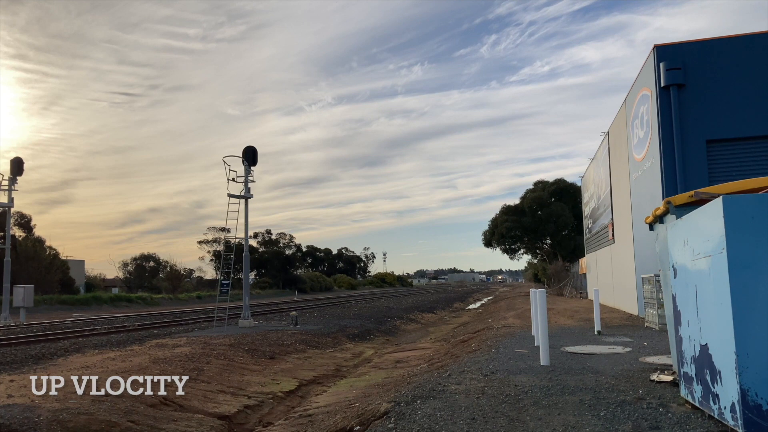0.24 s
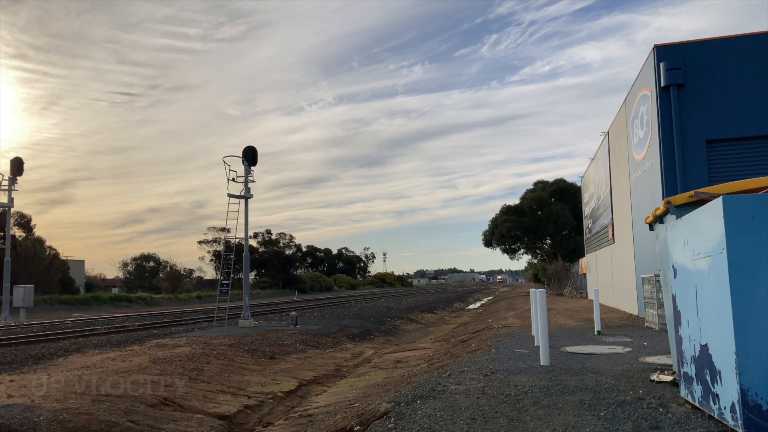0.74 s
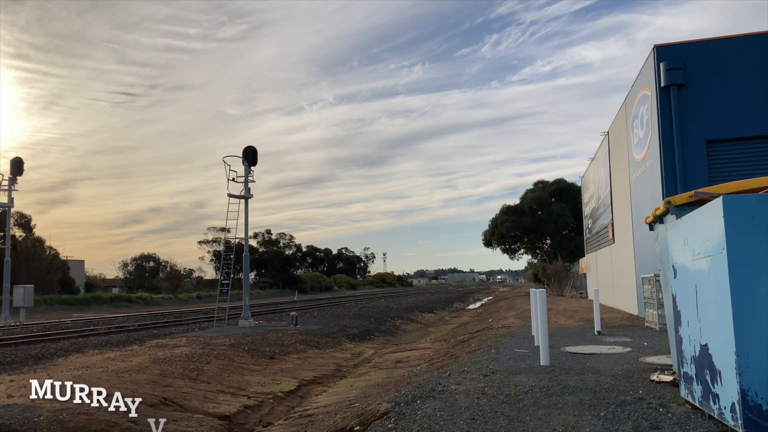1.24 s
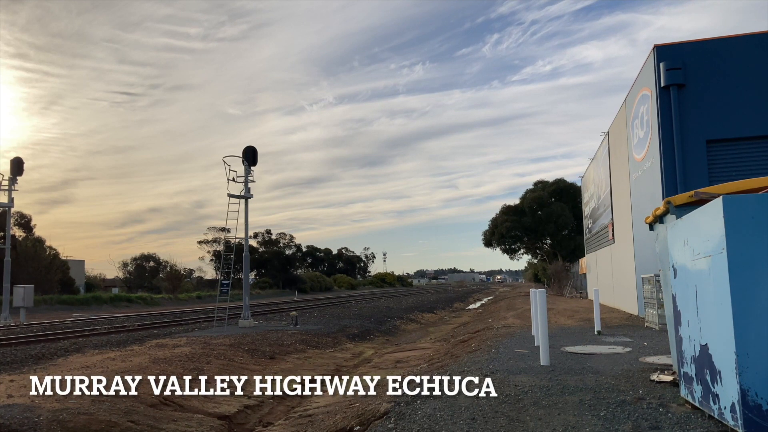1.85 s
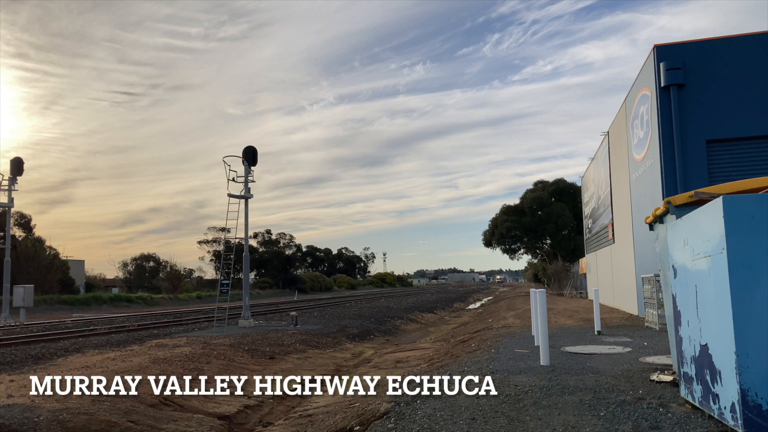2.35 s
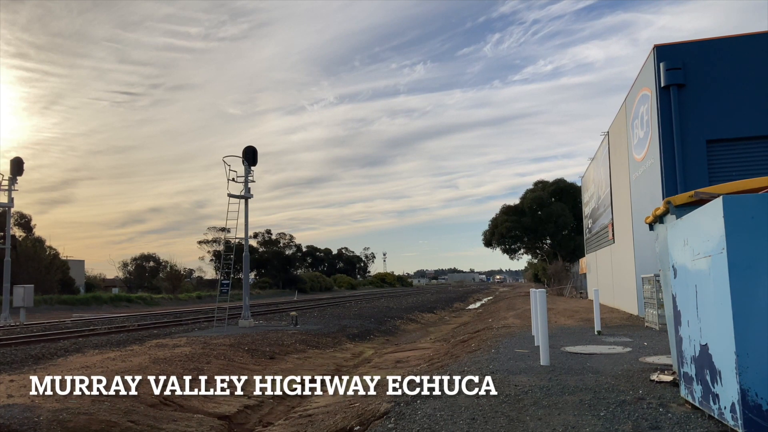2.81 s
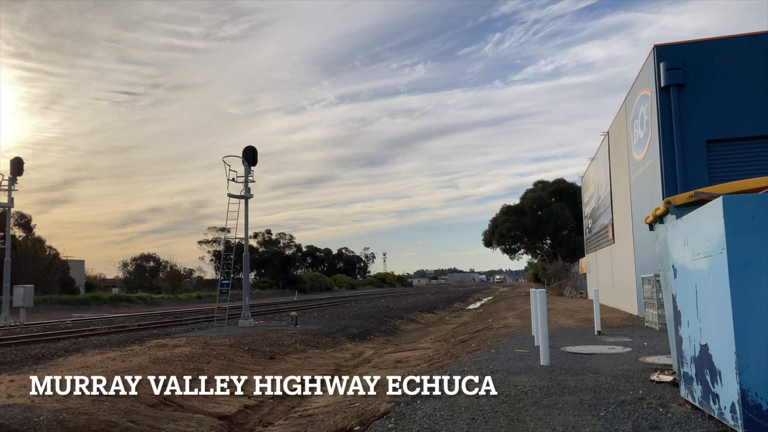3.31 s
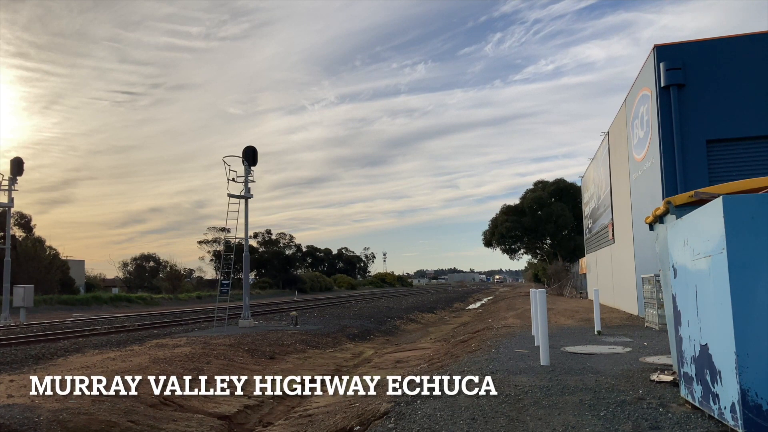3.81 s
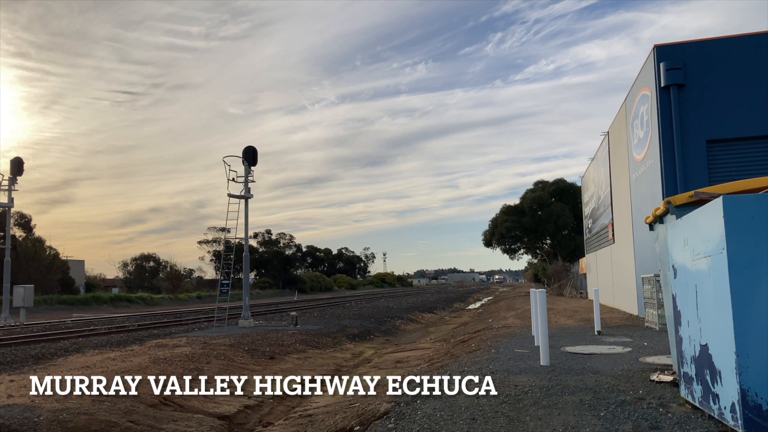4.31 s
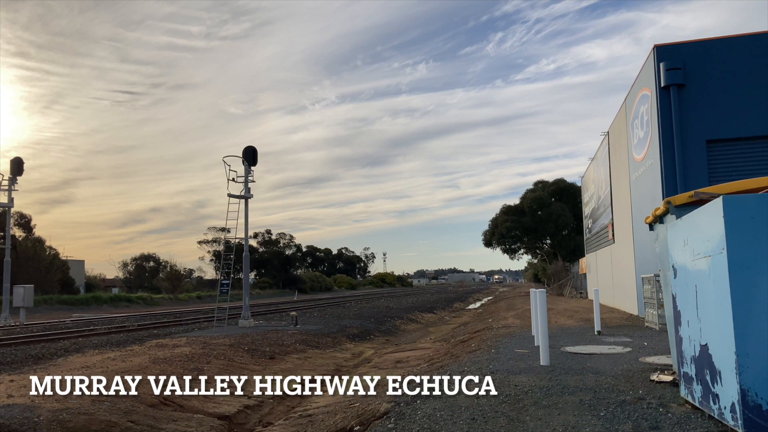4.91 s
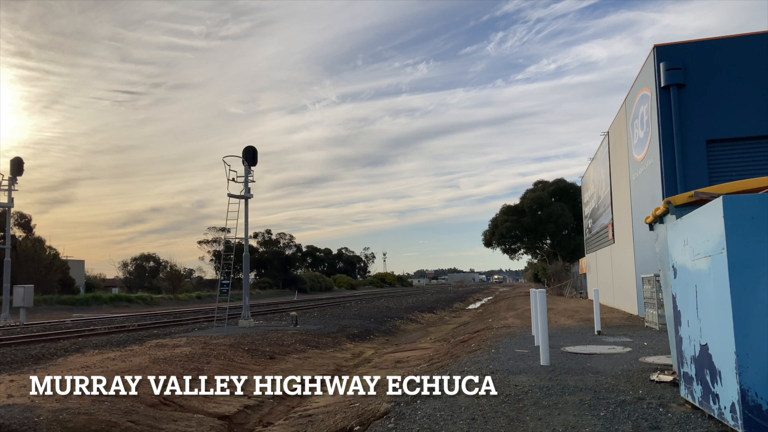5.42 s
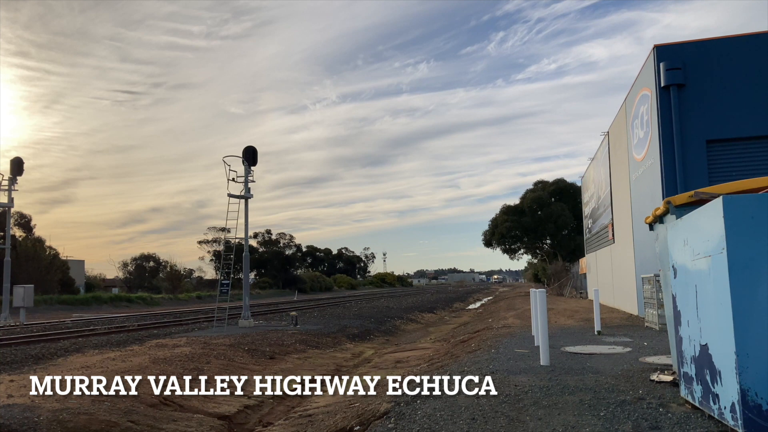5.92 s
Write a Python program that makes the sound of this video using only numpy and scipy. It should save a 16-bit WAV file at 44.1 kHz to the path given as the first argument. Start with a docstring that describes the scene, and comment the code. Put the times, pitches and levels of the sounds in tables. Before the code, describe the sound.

Roadside outdoors: rattling truck and trailer clank past, engine climbing and dropping in pitch, very high brake squeal, then duller low traffic rumble.

```python
"""First comes the rumble and tyre roar of a heavy vehicle close by, its left side leading, its load jingling.
Bumps thud, clang and clatter in its metal; grit snaps. It draws level, then drops away to a duller wash.
An engine climbs in pitch and drops back as the gear changes, its harmonics shaped by an exhaust pipe.
A thin, very high squeal, like dragging brakes, comes in several bites and fades: friction-driven resonance.
Shaped noise makes the road, with distant traffic building under it and a shed wall echoing alongside."""
import sys
import numpy as np
from scipy import signal
from scipy.fft import rfft, irfft
from scipy.io import wavfile

SR = 44100
rng = np.random.default_rng(int(sys.argv[2]) if len(sys.argv) > 2 else 0)


def file_out(sig):
    """Save sig as 16-bit WAV at sys.argv[1]."""
    # one column per channel
    cols = np.atleast_2d(sig).T
    # limit, then scale
    lim = np.clip(cols, -1, 1)
    pcm = np.round(lim * 32767).astype(np.int16)
    wavfile.write(sys.argv[1], SR, pcm)


N = 271215
T = np.arange(N) / SR
HZ = np.maximum(np.arange(N // 2 + 1) * SR / N, 1)   # frequency bins, kept above zero for the logarithms

# Splits between the five road bands: rumble, boom, tyre roar, whirr, hiss [f/Hz]
BAND_EDGES_HZ = [110, 300, 1400, 3200]
# Colour of the close vehicle, the wash it leaves behind and the distant stream
# [f/Hz, relative level/dB per Hz]
NEAR_SPECTRUM = [(24, -32), (38, -10.5), (68, -6), (110, -9.5), (215, -6.5), (490, -17.5), (950, -16),
                 (1550, -29), (2400, -22), (3200, -25), (4000, -28), (4600, -28.5), (5900, -38),
                 (7700, -35.5), (9200, -65), (11200, -38.5), (12400, -79)]
LEAVING_SPECTRUM = [(24, -22), (40, -7), (68, -4), (130, -9), (215, -12), (330, -20.5), (600, -23.5),
                    (830, -20.5), (2000, -33.5), (2700, -27.5), (3400, -48.5), (4900, -51.5), (5800, -54.5),
                    (7700, -53.5)]
FAR_SPECTRUM = [(24, -15), (40, -7.5), (85, -1.5), (150, -3), (240, -8), (310, -20.5), (500, -26),
                (830, -30.5), (1250, -37.5), (1600, -29), (2300, -31), (3400, -45.5), (4800, -44),
                (5900, -59), (7700, -61), (9200, -77), (11000, -58.5)]
# How near and far sound reaches the two microphones
# [f/Hz, likeness/0-1, left lead/rad, left minus right/dB]
NEAR_ARRIVAL = [(60, 0.98, 0.0, -1.8), (200, 0.92, 0.6, -2.9), (340, 0.82, 1.1, -3.0),
                (500, 0.86, 2.0, -1.0), (800, 0.88, 2.3, 1.9), (1300, 0.75, 2.5, 0.1),
                (2000, 0.46, 3.7, -2.0), (3000, 0.38, 5.7, -2.5), (4200, 0.41, 8.0, -3.7),
                (6000, 0.36, 9.9, -4.9), (8000, 0.45, 10.4, -1.5)]
FAR_ARRIVAL = [(60, 0.93, -0.0, -0.9), (200, 0.81, 0.2, -1.5), (340, 0.43, 0.8, -0.2), (500, 0.7, 2.3, 2.0),
               (800, 0.82, 2.6, 2.0), (1300, 0.81, 3.4, -0.9), (2000, 0.71, 5.5, -0.4),
               (3000, 0.55, 8.1, -0.4), (4200, 0.29, 11.6, 0.1), (6000, 0.31, 15.7, -1.1),
               (8000, 0.43, 17.2, -0.4)]
# Close vehicle as it draws level, one entry per road band [level/dB]
NEAR_DB = [-35.5, -37, -41, -56.5, -55]
# Its growth before that, brightening as it comes, one entry per road band [growth/dB per s]
APPROACH_DB_PER_S = [-0.7, -0.1, 0, 3, 6]
PASS_S, DROP_DB_PER_S = 1.776, 49   # once level, its direct sound drops quickly
# Duller wash that lingers once it has passed, one entry per road band [level/dB]
LEAVING_DB = [-40, -41, -47.5, -67.5, -67]
LEAVING_RISE_S, LEAVING_END_S, LEAVING_DB_PER_S = 0.24, 3.59, 11.5
# Distant stream at the moment of the pass, one entry per road band [level/dB]
FAR_DB = [-44, -42.5, -51, -56.5, -72.5]
FAR_DB_PER_S = 0.5159   # slow build
# Tyre noise swelling as wheels roll by
# [t/s, width/s, boom peak level/dB, roar peak level/dB, whirr peak level/dB, hiss peak level/dB]
WHEELS = [(0.02, 0.94, -43, -49, -76, -66.5), (1.17, 0.037, -34.5, -58, -71, -66),
          (1.29, 0.04, -35, -61, -57, -54.5), (1.42, 0.05, -39, -54, -61, -60),
          (1.56, 0.079, -60, -44, -55, -57), (1.82, 0.09, -39, -43.5, -54.5, -57),
          (2.07, 0.11, -37.5, -45.5, -70, -64.5), (2.35, 0.079, -41, -47, -75, -64.5),
          (4.85, 0.16, -44, -59.5, -69.5, -81), (6.04, 0.059, -56, -49, -75, -78)]
# Tyre whirr of an earlier car [f/Hz, relative level/dB per Hz]
EARLIER_CAR = [(1150, -17.5), (1450, 6), (1900, -3.5), (2500, -9), (3200, -23)]
EARLIER_CAR_DB, EARLIER_CAR_DB_PER_S = -51, 13   # level at the start, then its fade

# Resonances of the engine's exhaust pipe [f/Hz, gain/dB]
EXHAUST = [(62, 2.5), (69, 1.5), (73, 1), (76, 2), (78, 4.5), (80, -3.5), (83, -7), (125, 0), (138, 0.5),
           (146, -2.5), (156, 1), (160, -1.5), (165, 5), (200, -18.5), (232, -16), (240, -15.5), (248, -5),
           (285, -26), (318, -18), (335, -25.5), (700, -29)]
# Engine pulling through its gears; level is at CRUISE_HZ, ahead of the pipe
# [start t/s, end t/s, first firing f/Hz, last firing f/Hz, level/dB, overtone gain/dB]
PULLS = [(-.1, 0.565, 75, 83.76, -45, 2), (0.665, 1.22, 65.63, 71.2, -32.5, -8.5),
         (2.501, 3.204, 63.5, 66.78, -44.5, 2.5), (3.379, 5.66, 65.9, 83.61, -39.5, 0.5),
         (5.721, 6.2, 74, 75, -57, 2.5)]
PULL_BEND = .85   # below 1: the revs climb more slowly towards the end
THROTTLE_RISE_S, THROTTLE_OFF_DB_PER_S = 0.107, 38
SAG_HZ, SAG_S = 10, 0.04475   # the revs drop when the throttle closes
CRUISE_HZ, LOAD_DB_PER_HZ = 75, 0.16   # reference firing rate; louder at higher revs

# Grit snapping under tyres [t/s, level/dB, f/Hz]
GRIT = [(0.1246, -47, 7600), (0.2161, -37, 4600), (0.3305, -38, 6700), (0.3315, -39, 2600),
        (0.3535, -47, 6000), (0.459, -41, 5400), (0.667, -43, 7200), (1.03, -35, 3400), (1.203, -42, 4300),
        (1.682, -35, 2200)]
# Colour shared by the grit cracks [f/Hz, relative level/dB per Hz]
GRIT_SPECTRUM = [(1800, 10), (3000, 1), (5000, 0), (7800, 3), (9200, -18), (11000, 5.5), (14000, -35)]
GRIT_T60_S, GRIT_RISE_S = .008, .0002
GRIT_WIDTH_HZ, GRIT_RESONANCE_DB = 880, 11   # each stone's own resonance, added to the plain crack

# Load and trailer knocking; the thud is further weighted by the body's modes, t60 is of clang and clatter
# [t/s, thud level/dB, thud f/Hz, clang level/dB, clatter level/dB, t60/s]
KNOCKS = [(0.218, -27, 260, -45, -45, 0.048), (0.658, -24.5, 420, -40, -48, 0.11),
          (0.6704, -24.5, 220, -48, -69, 0.093), (.674, -35, 600, -50, -62, .06),
          (0.692, -26.5, 210, -56, -46.5, 0.082), (0.877, -30, 220, -41, -75, .15),
          (0.942, -31, 373, -50, -68, .1), (1.03, -31, 600, -30.5, -39, 0.13),
          (1.05, -40, 600.5, -42, -51, 0.22), (1.067, -44, 300, -43, -51, 0.23),
          (1.203, -40, 200, -46, -47.5, 0.36), (1.225, -42, 250, -53, -54, 0.13),
          (1.682, -37, 620, -38, -35, 0.13), (1.703, -43, 300, -36, -51.5, 0.58),
          (1.79, -33, 330, -51, -52, .2), (1.827, -41, 400, -51, -47, 0.099),
          (1.88, -38, 350, -47, -54, .12)]
# Steel body of the trailer; the load halves these decay times [f/Hz, level/dB, unloaded t60/s]
TRAILER_MODES = [(203, -2, 0.23), (222, 2, 0.36), (307, -2.5, 0.37), (389, 8.5, 0.14), (560, 3, 0.19),
                 (640, 0, 0.14)]
THUD_RISE_S, THUD_SPREAD_OCTAVES = 0.0021, 0.43   # brief build-up; reach around each bump's pitch
# Colour of the clanging and clattering steel [f/Hz, relative level/dB per Hz]
CLATTER_SPECTRUM = [(400, 0), (600, 12.5), (800, 5.5), (1300, 7), (2400, 9), (4000, 6), (7500, -3.5),
                    (10000, -52)]
# Ringing of the steel fittings [f/Hz, width/Hz, level above the rest of the clatter/dB]
FITTINGS = [(814, 28, 10), (1244, 50, 11.5), (2244, 49, 10), (2770, 180, 7), (3200, 60, 7.5),
            (3740, 70, 11), (4140, 92, 12), (4560, 70, 8), (5320, 21, 8), (6640, 38, 11)]
CLANG_BELOW_HZ = 1224   # panels clang below this, small fittings clatter above
BLOW_RISE_S = .0003

# Low exhaust boom surging [t/s, peak level/dB, f/Hz]
SURGES = [(.4, -28.5, 80.9), (.78, -34.5, 60.4), (1.18, -32, 69.7), (1.33, -38, 62.4), (2.08, -31, 63.2),
          (2.58, -30, 63.9), (2.79, -33.5, 76), (3.08, -30, 70.9), (3.27, -38, 67.5), (3.48, -34, 64.4),
          (4.8, -34, 75.1), (5.68, -36, 95.6)]
SURGE_WIDTH_S, SURGE_BAND_HZ = 0.024, 9.9
# Loose metal parts clinking [t/s, peak level/dB, f/Hz, t60/s]
CLINKS = [(.532, -23, 860, 0.05), (0.535, -25, 1100, 0.04), (.563, -34, 4820, .04), (.567, -42, 5080, 0.1)]

# Pitch line of the brake squeal [t/s, f/Hz]
SQUEAL_PITCH = [(0.7, 15420), (1.0, 15370), (1.5, 15300), (2.0, 15170), (2.5, 15090), (3.2, 15075),
                (4.2, 15100), (6.15, 15150)]
# The brake biting and squealing [start t/s, end t/s, level/dB, fade afterwards/dB per s]
BITES = [(0.744, 1.188, -36.5, 4), (1.11, 2.1, -33, 9), (2.856, 3.223, -26.5, 26), (3.42, 3.57, -29, 112),
         (3.704, 4.13, -40.5, 14), (5.75, 6.15, -60, 14)]
BITE_RISE_S = 0.17
# Brief thin tones and narrow bands of noise, mostly high and faint
# [start t/s, end t/s, f/Hz, width/Hz, peak level/dB]
THIN_TONES = [(.95, 1.01, 3200, 90, -54), (.97, 1.1, 12830, 120, -61), (1.14, 1.24, 12850, 120, -61),
              (1.17, 1.34, 7680, 100, -61), (1.51, 1.6, 7660, 90, -60), (1.58, 1.87, 9800, 120, -64),
              (1.6, 1.67, 5410, 50, -58), (3.24, 3.64, 8650, 50, -69), (3.6, 4.3, 11600, 35, -64),
              (4.25, 4.75, 11570, 35, -73), (4.72, 4.78, 4900, 900, -69), (5.02, 5.07, 5150, 250, -68),
              (5.1, 5.42, 11050, 40, -66), (5.15, 5.182, 4800, 450, -63), (5.18, 5.47, 12900, 60, -72),
              (5.19, 5.31, 7400, 1000, -76), (5.3, 5.97, 11055, 36, -48.5), (5.82, 6.1, 12890, 35, -71)]

# Other engines in the stream [start t/s, end t/s, f/Hz, level/dB]
DRONES = [(1.097, 1.437, 127.4, -40), (1.75, 2.15, 156, -44.5), (2.26, 2.65, 84.9, -42.5),
          (3.3, 6.15, 122.1, -46.5), (4.55, 5.3, 100.1, -42)]
DRONE_RISE_S, DRONE_FADE_DB_PER_S = 0.1, 58.5
# Hollow drone of the tyres as they pass [f/Hz, relative level/dB per Hz]
TYRE_DRUM = [(230, -14), (320, 5), (400, 4), (520, -3), (650, -25)]
DRUM_S, DRUM_WIDTH_S, DRUM_DB = 1.847, 0.16, -39.5

CUTOFF_HZ = 15850


def from_db(db):
    """Decibels to gain."""
    return 10 ** (np.asarray(db) / 20)


def rms(x):
    """Root mean square."""
    return np.sqrt(np.mean(x ** 2) + 1e-20)


def in_time(rows):
    """Each column of a curve, at every sample."""
    s, *columns = np.transpose(rows)
    return [np.interp(T, s, c) for c in columns]


def in_frequency(rows):
    """Each column of a spectrum table, at every frequency bin, drawn on a log frequency axis."""
    hz, *columns = np.transpose(rows)
    return [np.interp(np.log(HZ), np.log(hz), c) for c in columns]


def colour(spectrum):
    """Gain per bin, falling away steeply beyond the table's ends."""
    ends = np.minimum(1, HZ / spectrum[0][0]) * np.minimum(1, spectrum[-1][0] / HZ)
    return from_db(in_frequency(spectrum)[0]) * ends ** 6


def drift(rate_hz):
    """Random wander of rms 1, smoothed above the given rate."""
    slow = irfft(rfft(rng.standard_normal(N)) / (1 + (HZ / rate_hz) ** 2), N)
    return slow / rms(slow)


def stereo_noise(gain, arrival):
    """Spectra of left and right noise from one direction; their sum has the given colour."""
    alike, lead, balance_db = in_frequency(arrival)
    alike = np.clip(alike, 0, .995)
    tilt = from_db(balance_db / 2)
    common, own = rfft(rng.standard_normal((2, N)))
    right = alike * np.exp(-1j * lead) * common + np.sqrt(1 - alike ** 2) * own
    summed = np.sqrt(tilt ** 2 + tilt ** -2 + 2 * alike * np.cos(lead))
    return np.array([common * tilt, right / tilt]) * gain / summed


def sound_of(spectra):
    """Stereo spectra to sound whose mid has rms 1."""
    x = irfft(spectra, N)
    return x / rms(x.mean(axis=0))


def from_near(x):
    """One sound as it reaches both microphones from the near vehicle: delayed and tilted by frequency."""
    _, lead, balance_db = in_frequency(NEAR_ARRIVAL)
    tilt = from_db(balance_db / 2)
    return irfft(rfft(x) * np.array([tilt, np.exp(-1j * lead) / tilt]), N)


def burst(start, t60, rise):
    """Envelope of a blow: a quick rise, then exponential decay."""
    age = np.maximum(T - start, 0)
    return (1 - np.exp(-age / rise)) * np.exp(-np.minimum(np.log(1000) * age / t60, 20))


def held(start, end, rise_s, fade_db_per_s):
    """Envelope that eases in, holds at 1 and fades after its end."""
    rise = np.sin(np.pi / 2 * np.clip((T - start) / rise_s, 0, 1)) ** 2
    return rise * from_db(-abs(fade_db_per_s) * np.maximum(T - end, 0))


def swelling(s, db, width_s):
    """Envelope of a smooth swell around one moment."""
    return from_db(db) * np.exp(-.5 * ((T - s) / width_s) ** 2)


def ring(clicks, hz, t60):
    """A two-pole resonator: a unit click sets a decaying sine of height 1 ringing."""
    r, w = from_db(-60 / (t60 * SR)), 2 * np.pi * hz / SR
    return signal.lfilter([0, np.sin(w)], [1, -2 * r * np.cos(w), r * r], clicks + 1e-18)


def near_gain(band):
    """The close vehicle in one band: it approaches, draws level and drops away."""
    before, after = np.maximum(PASS_S - T, 0), np.maximum(T - PASS_S, 0)
    return from_db(NEAR_DB[band] - APPROACH_DB_PER_S[band] * before - DROP_DB_PER_S * after)


def traffic(flutter_db=1.5, flutter_rate_hz=14):
    """Exhaust rumble and tyre noise, handed over from the passing vehicle to the distant stream."""
    near = stereo_noise(colour(NEAR_SPECTRUM), NEAR_ARRIVAL)
    leaving = stereo_noise(colour(LEAVING_SPECTRUM), FAR_ARRIVAL)
    far = stereo_noise(colour(FAR_SPECTRUM), FAR_ARRIVAL)
    lingering = held(PASS_S, LEAVING_END_S, LEAVING_RISE_S, LEAVING_DB_PER_S)
    building = from_db(FAR_DB_PER_S * (T - PASS_S))
    wheel_shapes = np.array([swelling(s, 0, width_s) for s, width_s, *_ in WHEELS])
    wheels = from_db(np.array(WHEELS)[:, 2:].T) @ wheel_shapes
    below = [0] + [1 / (1 + (HZ / edge) ** 10) for edge in BAND_EDGES_HZ] + [1]
    out = 0
    for k, swell in enumerate([0, *wheels]):   # the wheels leave the rumble band alone
        close = np.hypot(near_gain(k), swell)
        band = below[k + 1] - below[k]
        noise = close * sound_of(near * band)
        noise = noise + from_db(LEAVING_DB[k]) * lingering * sound_of(leaving * band)
        noise = noise + from_db(FAR_DB[k]) * building * sound_of(far * band)
        out = out + noise * from_db(flutter_db * drift(flutter_rate_hz))
    return out


def jingle(per_s=420, spread_db=2.0, cycles=45, level_db=-2.0, count=48):
    """Loose chains and panels ping at random; each band of pings follows the near vehicle's level."""
    born = (rng.random(N) < per_s / SR) * rng.choice([-1, 1], N)
    clicks = born * from_db(spread_db * np.minimum(rng.exponential(1, N), 3))
    dealt = rng.integers(0, count, N)   # which part each click strikes
    pitches = np.geomspace(320, 5600, count) * rng.uniform(.98, 1.02, count)
    bands = np.searchsorted(BAND_EDGES_HZ, pitches)
    out = 0
    for band in np.unique(bands):
        pings = 0
        for k in np.flatnonzero(bands == band):
            t60_s = 0.043 + cycles / pitches[k]
            pings = pings + ring(clicks * (dealt == k), pitches[k], t60_s)
        out = out + from_db(level_db) * near_gain(band) * pings / rms(pings)
    return from_near(out)


def earlier_car():
    """The whirr of a car that has already gone by fades down the road: coloured noise, steadily dying."""
    whirr = sound_of(stereo_noise(colour(EARLIER_CAR), FAR_ARRIVAL))
    return from_db(EARLIER_CAR_DB - EARLIER_CAR_DB_PER_S * T) * whirr


def shed_wall(x, delay_s=0.0079, echo_db=-20.0, above_hz=300):
    """The wall alongside throws back all but the bass, putting a fine ripple on the road noise."""
    echo = from_db(echo_db) * np.exp(-2j * np.pi * HZ * delay_s) / (1 + (above_hz / HZ) ** 2)
    return irfft(rfft(x) * (1 + echo), N)


def throttle():
    """Firing rate, level and overtone strength: the revs climb through each pull and sag when it ends."""
    firing_hz, effort, overtones_db = np.full(N, float(CRUISE_HZ)), 0, 0
    for start, end, first_hz, last_hz, db, bright_db in PULLS:
        climb = np.clip((T - start) / (end - start), 0, 1) ** PULL_BEND
        sag = SAG_HZ * (1 - np.exp(-np.maximum(T - end, 0) / SAG_S))
        firing_hz = np.where(T >= start, first_hz + (last_hz - first_hz) * climb - sag, firing_hz)
        overtones_db = np.where(T >= start, bright_db, overtones_db)
        effort = effort + from_db(db) * held(start, end, THROTTLE_RISE_S, THROTTLE_OFF_DB_PER_S)
    return firing_hz, effort * from_db(LOAD_DB_PER_HZ * (firing_hz - CRUISE_HZ)), overtones_db


def engine(wobble=.0035, rough_db=0.9, lead_s=.0004, pan_db=-1.6):
    """Harmonics of the firing rate swell and sink as they glide through the pipe's resonances."""
    firing_hz, effort, overtones_db = throttle()
    phase = 2 * np.pi * np.cumsum(firing_hz * (1 + wobble * drift(6.5))) / SR
    lead = 2 * np.pi * firing_hz * lead_s * np.array([[1], [0]])   # the left side hears it first
    pipe_hz, pipe_db = np.transpose(EXHAUST)
    out = 0
    for k in range(1, 8):
        resonance_db = np.interp(k * firing_hz, pipe_hz, pipe_db)
        gain = effort * from_db(resonance_db + overtones_db * (k > 1) + rough_db * drift(5.7))
        out = out + np.sqrt(2) * gain * np.cos(k * (phase + lead) + rng.uniform(0, 2 * np.pi))
    return out * from_db(pan_db / 2 * np.array([[1], [-1]]))


def grit():
    """Stones snap under the tyres, each a very short noise crack with its own resonance."""
    crack, out = stereo_noise(colour(GRIT_SPECTRUM), NEAR_ARRIVAL), 0
    for s, db, hz in GRIT:
        resonance = 1 + from_db(GRIT_RESONANCE_DB) / (1 + (2 * (HZ - hz) / GRIT_WIDTH_HZ) ** 2)
        out = out + from_db(db) * burst(s, GRIT_T60_S, GRIT_RISE_S) * sound_of(crack * resonance)
    return out


def thuds():
    """Each bump sets the trailer's body ringing, most strongly in the modes near its own pitch."""
    s, thud_db, thud_hz = np.array(KNOCKS)[:, :3].T
    out = np.zeros(N)
    for hz, db, t60 in TRAILER_MODES:
        nearness = np.exp(-.5 * (np.log2(hz / thud_hz) / THUD_SPREAD_OCTAVES) ** 2)
        clicks = np.zeros(N)
        clicks[np.round(s * SR).astype(int)] = nearness * from_db(thud_db + db + rng.normal(0, 1, len(s)))
        out += ring(clicks, hz, t60 / 2)   # the load damps the body
        out -= ring(clicks, hz, np.log(1000) * THUD_RISE_S)   # taking away a quick ring softens the onset
    return from_near(out)


def rattles(chatter_db=0.5):
    """Bumps make the panels clang and the steel fittings clatter unevenly: resonant noise in bursts."""
    blows = np.array([burst(row[0], row[5], BLOW_RISE_S) for row in KNOCKS])
    clang, clatter = from_db(np.array(KNOCKS)[:, 3:5].T) @ blows * from_db(chatter_db * drift(62))
    ringing = 1
    for hz, width, db in FITTINGS:
        ringing = ringing + (from_db(db) - 1) / (1 + (2 * (HZ - hz) / width) ** 2)
    steel = colour(CLATTER_SPECTRUM) * ringing
    low = 1 / (1 + (HZ / CLANG_BELOW_HZ) ** 10)
    panels = sound_of(stereo_noise(steel * low, NEAR_ARRIVAL))
    fittings = sound_of(stereo_noise(steel * (1 - low), NEAR_ARRIVAL))
    return clang * panels + clatter * fittings


def surges():
    """Brief low exhaust booms, each a sine wavering around its own pitch."""
    waver = np.cumsum(SURGE_BAND_HZ / 2 * drift(21.1)) / SR
    out = 0
    for s, db, hz in SURGES:
        boom = np.sin(2 * np.pi * (hz * T + waver))
        out = out + np.sqrt(2) * swelling(s, db, SURGE_WIDTH_S) * boom
    return from_near(out)


def clinks():
    """Loose metal parts strike and ring briefly, each a decaying sine."""
    out = 0
    for s, db, hz, t60 in CLINKS:
        out = out + from_db(db) * burst(s, t60, BLOW_RISE_S) * np.sin(2 * np.pi * hz * (T - s))
    return from_near(out)


def friction_tone(pitch_hz, width_hz, skirt_hz):
    """A narrow resonance kept ringing by random friction; rms 1."""
    shape = 1 / np.sqrt(1 + (2 * HZ / width_hz) ** 2) / (1 + (HZ / skirt_hz) ** 2) ** 2
    a, b = irfft(rfft(rng.standard_normal((2, N))) * shape, N)
    phase = 2 * np.pi * np.cumsum(pitch_hz + np.zeros(N)) / SR
    tone = a * np.cos(phase) + b * np.sin(phase)
    return tone / rms(tone)


def squeal(side_db=-6.5, early_width_hz=190, late_width_hz=110):
    """The squeal sinks, edges back up and grows purer; brief thin tones, mostly faint, come and go below it."""
    pitch_hz = in_time(SQUEAL_PITCH)[0]
    settled = np.clip(T - 2, 0, 1)   # crossfade from 2 to 3 s
    broad = friction_tone(pitch_hz, early_width_hz, skirt_hz=560)
    pure = friction_tone(pitch_hz, late_width_hz, skirt_hz=440)
    power = sum((from_db(db) * held(start, end, BITE_RISE_S, fade)) ** 2 for start, end, db, fade in BITES)
    out = np.sqrt(power) * (np.sqrt(1 - settled) * broad + np.sqrt(settled) * pure)
    for start, end, tone_hz, width_hz, db in THIN_TONES:
        swell = np.sin(np.pi * np.clip((T - start) / (end - start), 0, 1))
        out = out + from_db(db) * swell * friction_tone(tone_hz, width_hz, skirt_hz=3 * width_hz)
    # the sound reaches one microphone part of a cycle before the other
    side = from_db(side_db) * irfft(1j * rfft(out), N)
    return np.array([out + side, out - side])


def drones(wander=0.0122, waver_db=0.5):
    """Other engines in the stream hum through the rumble for a while, never quite steady."""
    out = 0
    for start, end, hz, db in DRONES:
        phase = 2 * np.pi * np.cumsum(hz * (1 + wander * drift(3.87))) / SR
        level = from_db(db + waver_db * drift(5)) * held(start, end, DRONE_RISE_S, DRONE_FADE_DB_PER_S)
        out = out + np.sqrt(2) * level * np.sin(phase)
    return from_near(out)


def tyre_drum():
    """The tyres drone hollowly for a moment around the pass: a swell of narrow-band noise."""
    drone = sound_of(stereo_noise(colour(TYRE_DRUM), NEAR_ARRIVAL))
    return swelling(DRUM_S, DRUM_DB, DRUM_WIDTH_S) * drone


def scene():
    """Everything on the road, in open air; only the road noise and jingle return from the wall."""
    road = shed_wall(traffic() + jingle() + earlier_car() + tyre_drum())
    metal = thuds() + rattles() + clinks()
    return road + engine() + grit() + metal + surges() + squeal() + drones()


def record(dry):
    """The top is cut steeply."""
    return irfft(rfft(dry) / np.sqrt(1 + (HZ / CUTOFF_HZ) ** 400), N)


dry = scene()
out = record(dry)
file_out(out)
```